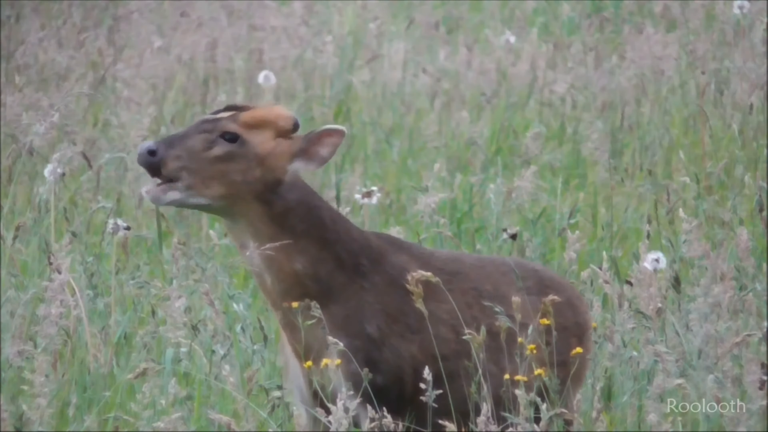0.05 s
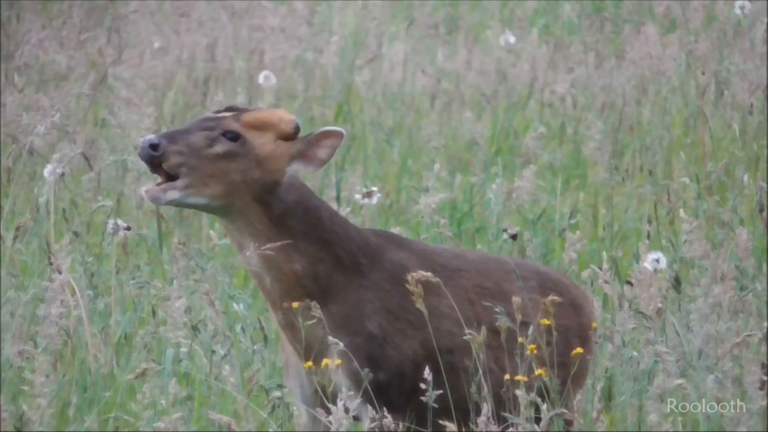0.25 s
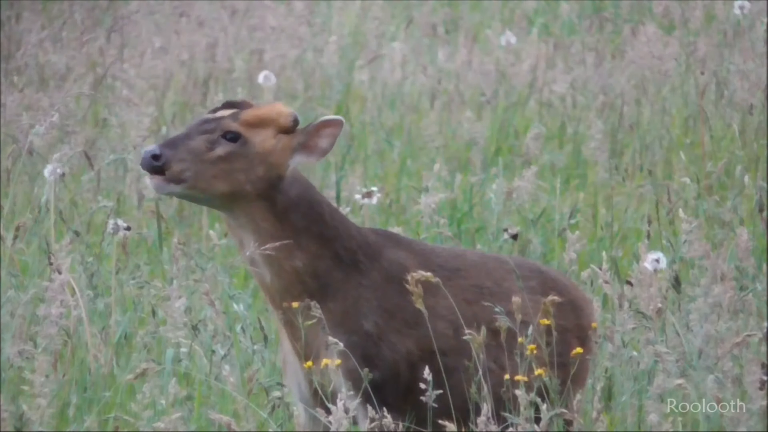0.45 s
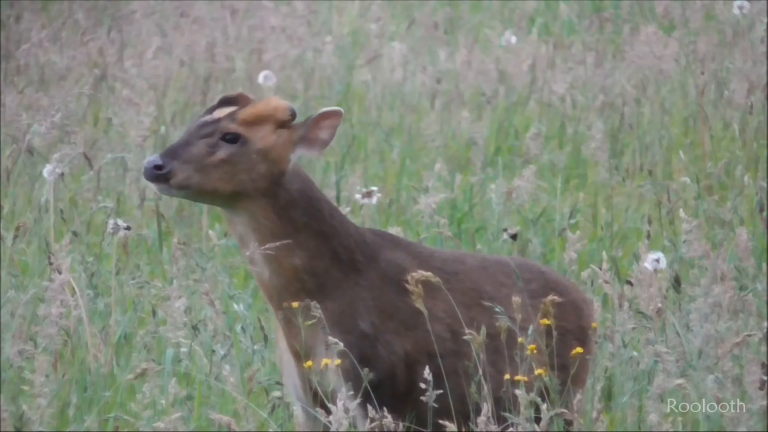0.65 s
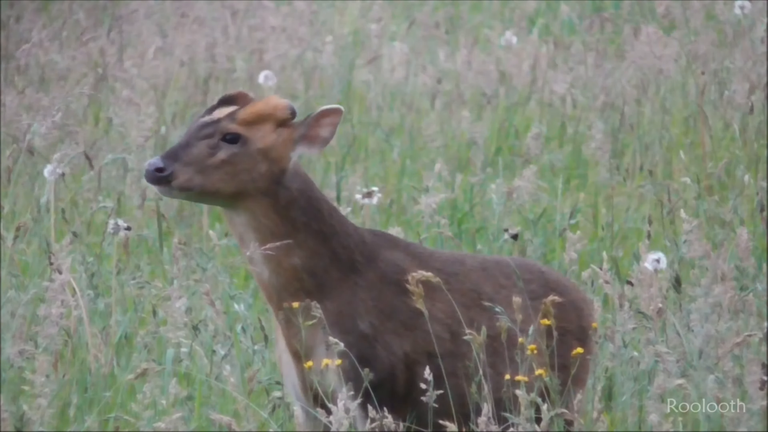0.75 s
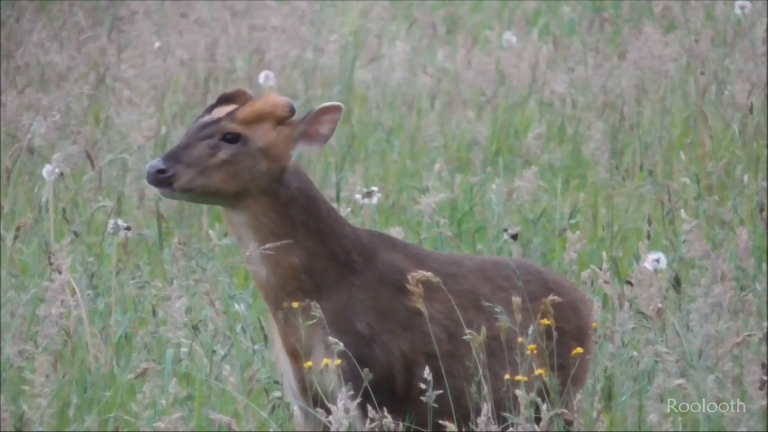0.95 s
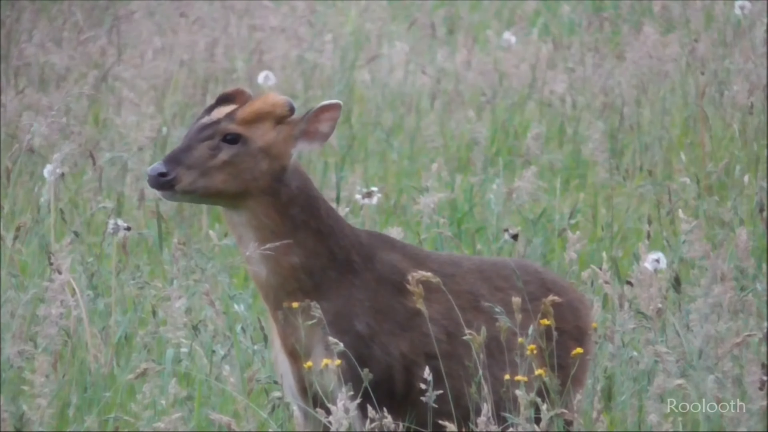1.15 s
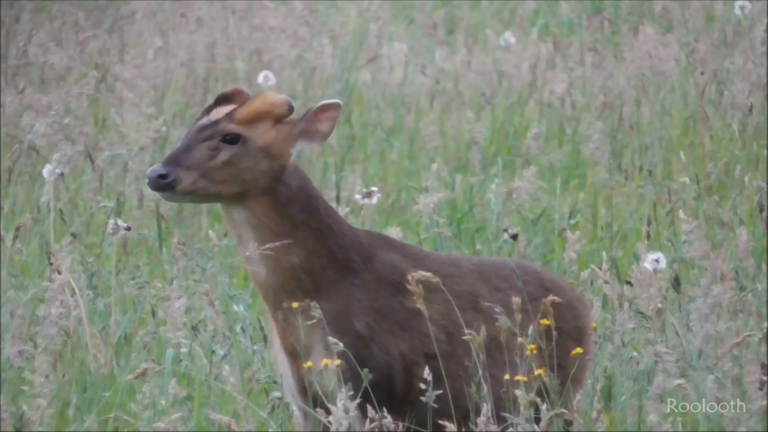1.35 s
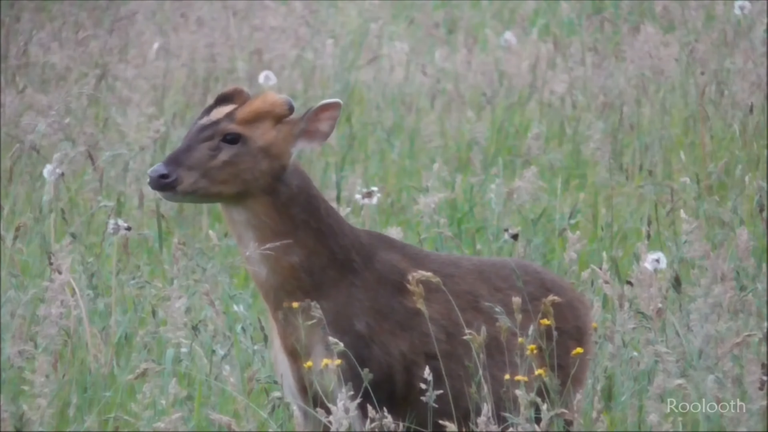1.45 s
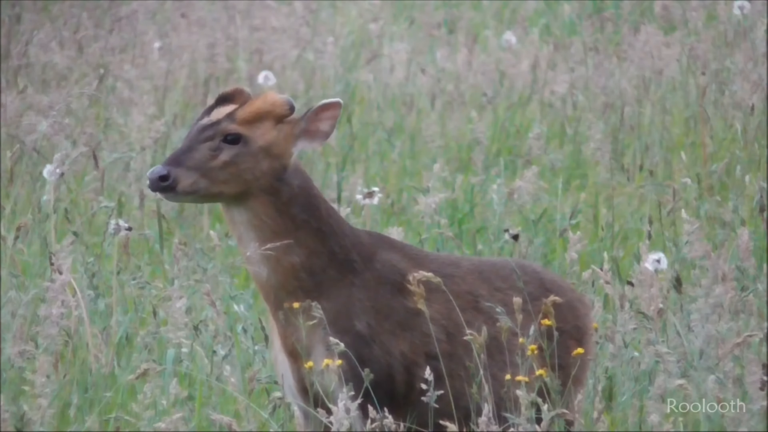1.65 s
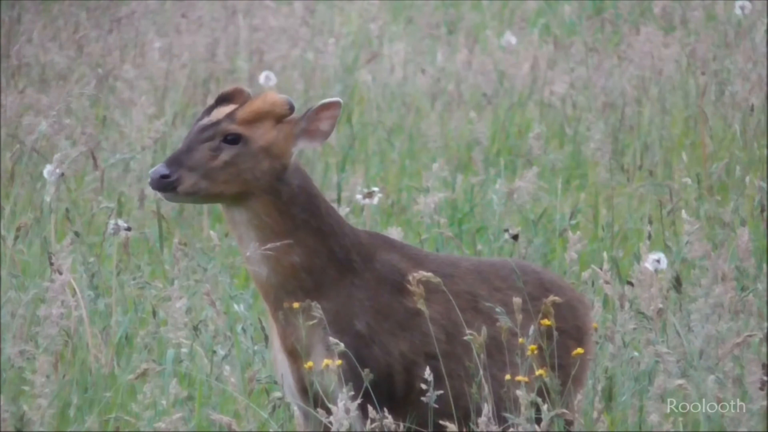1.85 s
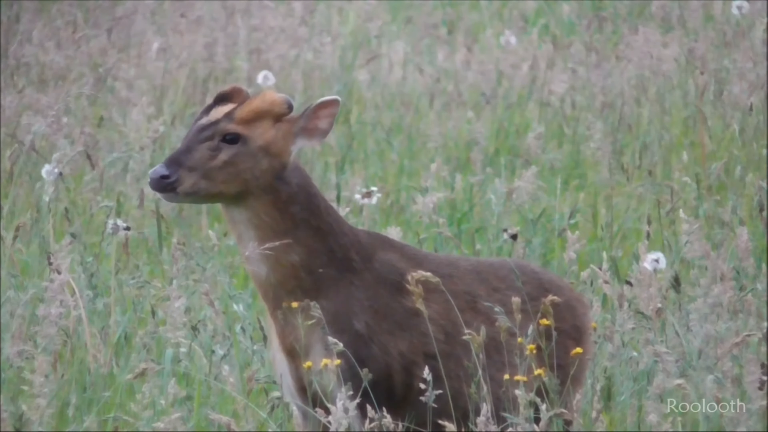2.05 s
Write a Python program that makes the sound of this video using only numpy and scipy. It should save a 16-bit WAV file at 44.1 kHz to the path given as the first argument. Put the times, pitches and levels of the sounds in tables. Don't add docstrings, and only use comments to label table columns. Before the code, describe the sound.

One abrupt, hoarse bark from a small deer, close and nearly centred, with a short echo from trees; a faint two-note bird whistle comes just before and twice after, over low outdoor rumble and hiss.

```python
import sys
import numpy as np
from scipy import signal
from scipy.fft import rfft, irfft, next_fast_len
from scipy.io import wavfile
from scipy.ndimage import uniform_filter1d, map_coordinates

SR = 44100
rng = np.random.default_rng(int(sys.argv[2]) if len(sys.argv) > 2 else 0)


def volts_from_decibels(level):
    exponent = np.asarray(level, float) / 20
    return 10 ** exponent


def int16_out(signal):
    q = np.round(np.clip(np.atleast_2d(signal).T, -1, 1) * 32767)
    wavfile.write(sys.argv[1], SR, q.astype(np.int16))


N = 92610

# frequency_hz, density_db [dB per Hz]
RUMBLE_SPECTRUM = [(25, -31), (60, -15.5), (100, -2), (125, -7), (200, -4), (600, -6.5), (1200, -16.5),
                   (2200, -37.5)]
# frequency_hz, density_db [dB per Hz]
HISS_SPECTRUM = [(1000, -39), (1700, -15), (2290, -7), (2930, -11.5), (4450, -13.5), (6150, -18.5),
                 (7200, -14), (10500, -11.5), (15500, -14)]
# frequency_hz, likeness [0-1]
COHERENCE = [(30, 0.93), (100, 0.92), (350, 0.73), (1000, 0.23), (3000, 0.088), (9000, 0.053)]
# frequency_hz, left_over_right_db
BALANCE = [(30, -1), (180, -3), (350, 1.4), (10000, -0.3)]
# start_s, length_s, centre_hz,
# width_hz, level_db
CHATTER_BANDS = [
    (0, .13, 2750, 120, -77),
    (0, .22, 6800, 600, -79),
    (1.79, .08, 3100, 800, -75),
    (1.87, .09, 4400, 900, -79),
    (2.01, .09, 4000, 900, -79),
    (1.03, .13, 3150, 450, -75),
    (.8, 1.3, 560, 12, -67),
]
# start_s, length_s, start_hz,
# end_hz, level_db
TWITTER_NOTES = [(.088, .016, 4650, 5100, -70), (.099, .015, 5050, 4400, -68),
                 (.125, .015, 6000, 6800, -78), (1.4, .025, 3620, 3620, -78), (.178, .014, 2400, 2430, -66),
                 (1.49, .03, 2200, 1800, -75), (1.683, .03, 2250, 1800, -73),
                 (1.695, .012, 2900, 2850, -73), (1.806, .014, 3500, 2800, -70),
                 (1.822, .012, 2950, 2850, -71), (1.805, .05, 3500, 3700, -80),
                 (1.802, .03, 4300, 4250, -78), (1.825, .05, 1780, 2050, -68),
                 (1.868, .04, 2050, 2500, -73), (1.896, .017, 4650, 4200, -63),
                 (1.924, .011, 4200, 6200, -69), (1.925, .014, 6500, 6400, -71),
                 (1.992, .018, 5150, 4400, -59), (2.02, .013, 4800, 6250, -69),
                 (2.024, .014, 6900, 7500, -72), (2.022, .04, 4200, 4650, -69),
                 (2.055, .04, 4650, 4750, -70), (2.008, .055, 3200, 3650, -75),
                 (2.05, .05, 3600, 3950, -77), (2.088, .018, 4800, 5500, -62),
                 (1.775, .03, 2900, 3300, -79)]
# time_s [after start], pitch_hz, level_db
WHISTLE_SHAPE = [(0, 2450, -27), (.018, 2650, -25), (.03, 3450, -11), (.041, 3610, -5), (.056, 3620, -14),
                 (.074, 3600, 1), (.083, 3590, -5), (.088, 3100, -24), (.096, 2800, -9), (.108, 2710, -16),
                 (.118, 2710, -8), (.13, 2700, -30)]
# start_s, level_db, stretch [times], lower_note_db
WHISTLE_CALLS = [
    (0.176, -55, 1, -1),
    (0.579, -48, 1.14, -7),
    (1.003, -48.5, 1, -2),
]
# time_s, pitch_hz, level_db, roughness [0-1], mouth [scale of the resonances]
BARK_COURSE = [
    (.207, 561.4, -46, 0.06, 0.65),
    (.222, 793.7, -32.5, 0.2, 0.94),
    (0.247, 798.4, -29, 0.33, 1.005),
    (.285, 789.6, -26.5, 0.44, 1.001),
    (.33, 835.8, -26.5, 0.58, 1.03),
    (0.452, 837.7, -26.5, 0.64, 1.007),
    (.52, 807, -29, 0.79, 1),
    (0.566, 794.3, -34.5, 0.63, 0.982),
    (0.601, 730, -47, 0, 0.95),
]
# time_s, pitch_hz, level_db
SECOND_COURSE = [
    (0.227, 950, -36),
    (0.245, 954.2, -26),
    (0.315, 967.7, -23),
    (0.339, 886.9, -30),
    (0.365, 975.3, -23),
    (0.394, 992.7, -23),
    (0.421, 923.2, -25),
    (0.468, 960, -25.5),
    (0.583, 915, -43),
]
# centre_hz, width_hz, level_db
THROAT_RESONANCES = [(665, 160, -8.5), (816, 294, -12.5), (967, 147, -4.5), (1247, 250, -12.5),
                     (1614, 150, -8), (2480, 130, -8.5), (2820, 130, -17), (3800, 650, -21.5),
                     (4270, 430, -24), (5200, 630, -30.5), (7060, 390, -42.5), (8380, 440, -38),
                     (10300, 2100, -49.5), (11800, 910, -42)]
# frequency_hz, level_db
VOICE_COLOUR = [(480, -74), (600, -24), (2000, -17), (3300, -27.5), (4500, -50), (5000, -61), (12500, -71),
                (15500, -63)]
# frequency_hz, level_db
GRASS_SCATTER = [(500, -18), (2500, -14.5), (5000, -7), (9000, -1.5)]
# frequency_hz, t60_s
TREE_DECAY = [(500, 0.64), (750, 1.02), (1000, 0.94), (2500, 0.88), (4500, 0.39), (10000, 0.1)]
# frequency_hz, level_db
ECHO_TINT = [(600, 2), (750, 4), (970, -3), (1200, -7.5), (2500, -12), (6000, 11)]

RUMBLE_DB, HISS_DB = -51.5, -70
TWITTER_DB = 1
PITCH_DRIFT, SECOND_DRIFT = .016, .04
JITTER, SHIMMER_DB = 0.15, 3
FLUTTER_DB, FLUTTER_PER_S = .5, 70
GROWL_DB, GROWL_PER_S = 1.2, 300
SECOND_DB, SECOND_DEPTH = -2.5, 0.49
DULLING, DULL_TOP_HZ, WAVER_DB, WAVER_PER_S = 0.72, 6500, 1, 45.66
RASP_S, RASP_LONG_S, RASP_DB = 0.244, 0.032, 11.5
CLOSE_S, CLOSED_S, NASAL_DB, HISS_UP_DB = 0.541, 0.563, 7, 2.5
DEER_LEAN_DB, SCATTER_S = -0.34, .05
ECHO_DB, ECHO_S = -13.5, .02
WHISTLE_ECHO_DB, TWITTER_ECHO_DB, BIRD_STRETCH = -13, -12, 2.2
NEAR_ECHO_DB, NEAR_STRETCH = -11, .3
TOP_HZ = 15720


def unit(x):
    return x / np.sqrt(np.mean(x ** 2) + 1e-20)


def along(points, hz):
    f, v = np.transpose(points)
    return np.interp(np.log(hz + 1), np.log(f + 1), v)


def wobble(rate):
    knots = rng.standard_normal(int(N * 400 / SR) + 4)
    return map_coordinates(knots, [np.arange(N) * min(rate, 399) / SR])


def filtered(x, response):
    m = next_fast_len(N + SR // 2)
    return irfft(rfft(x, m) * response(np.fft.rfftfreq(m, 1 / SR)), m)[..., :N]


def rush(spectrum, patchy_db):
    z = signal.stft(rng.standard_normal((2, N)), nperseg=512)[2]
    field = uniform_filter1d(rng.standard_normal(z.shape[1:]), size=5, axis=0)
    field = uniform_filter1d(field, size=12, axis=1)
    pair = signal.istft(z * volts_from_decibels(patchy_db * unit(field)), nperseg=512)[1][:, :N]
    (low, low_db), (high, high_db) = spectrum[0], spectrum[-1]
    shut = [(low / 4, low_db - 60)] + list(spectrum) + [(high * 4, high_db - 60)]

    def mid_side(hz):
        turn = np.arccos(np.clip(along(COHERENCE, hz), -1, 1)) / 2
        return volts_from_decibels(along(shut, hz)) * [np.cos(turn), np.sin(turn)]

    mid, side = filtered(pair, mid_side)
    stereo = np.array([mid + side, mid - side])
    return unit(filtered(stereo, lambda hz: volts_from_decibels(np.outer([.5, -.5], along(BALANCE, hz)))))


def background():
    swell_db = .4 * wobble(1.3) + .3 * wobble(8)
    rumble = volts_from_decibels(RUMBLE_DB + swell_db) * rush(RUMBLE_SPECTRUM, patchy_db=-0.06)
    return rumble + volts_from_decibels(HISS_DB) * rush(HISS_SPECTRUM, patchy_db=.2)


def chatter():
    t, out = np.arange(N) / SR, np.zeros((2, N))
    for start, length, hz, width_hz, db in CHATTER_BANDS:
        progress = np.clip((t - start) / length, 0, 1)
        swell = np.sqrt(np.abs(np.sin(np.pi * progress)))
        band = filtered(rng.standard_normal((2, N)), lambda f: np.exp(-((f - hz) / width_hz) ** 2))
        out += volts_from_decibels(db + 2.3 * wobble(60.06)) * swell * unit(band + band[::-1] / 2)
    return out


def twitter():
    t, out = np.arange(N) / SR, np.zeros(N)
    rasp = 1 + .009 * wobble(300)
    for start, length, hz0, hz1, db in TWITTER_NOTES:
        u = np.clip((t - start) / length, 0, 1)
        glide = u * (2 - u) if hz1 > hz0 else u ** 2
        phase = 2 * np.pi * np.cumsum((hz0 + (hz1 - hz0) * glide) * rasp) / SR
        swell = np.sqrt(np.abs(np.sin(np.pi * u))) * (u < 1)
        out += volts_from_decibels(db + TWITTER_DB) * swell * np.sin(phase)
    return out * volts_from_decibels(3 * wobble(150))


def whistler():
    s, hz, db = np.transpose(WHISTLE_SHAPE)
    t, out = np.arange(N) / SR, np.zeros(N)
    for start, level_db, stretch, lower_db in WHISTLE_CALLS:
        u = (t - start) / stretch
        phase = 2 * np.pi * np.cumsum(np.interp(u, s, hz)) / SR
        shape_db = np.interp(u, s, db + lower_db * (s > .085), -200, -200)
        tone = np.sin(phase) + volts_from_decibels(-31) * np.sin(2 * phase)
        out += volts_from_decibels(level_db + shape_db + wobble(70.15)) * tone
    return out


def second_vibration(t):
    s, hz, _ = np.transpose(SECOND_COURSE)
    drifting_hz = np.interp(t, s, hz) * (1 + SECOND_DRIFT * wobble(109.56))
    return np.cos(2 * np.pi * np.cumsum(drifting_hz) / SR)


def fold_pulses(cycles, hz, rough):
    chance = rng.standard_normal((2000, 2))[:int(cycles[-1])]
    when = np.interp(np.arange(len(chance)) + .5, cycles, np.arange(N))
    index = when.astype(int)
    at = rough[index]
    when = np.clip(when + JITTER * at * chance[:, 0] * SR / hz[index], 8, N - 9)
    taps = np.floor(when)[:, None] + np.arange(-7, 9)
    offset = taps - when[:, None]
    shape = np.sinc(offset) * np.cos(np.pi * offset / 16) ** 2
    sized = shape * volts_from_decibels(SHIMMER_DB * at * chance[:, 1])[:, None]
    return np.bincount(taps.astype(int).ravel(), sized.ravel(), N)


def resonance(x, hz, width_hz):
    turn = np.exp(2j * np.pi * np.cumsum(hz) / SR)
    pole = np.exp(-np.pi * 1.5 * width_hz / SR)
    return 2 * np.real(turn * signal.lfilter([(1 - pole) ** 2], [1, -2 * pole, pole ** 2], x / turn))


def throat(source, t, level_db, mouth):
    closing = np.clip((t - CLOSE_S) / (CLOSED_S - CLOSE_S), 0, 1)
    weak_db = level_db - level_db.max()
    rasp_db = RASP_DB * np.exp(-((t - RASP_S) / RASP_LONG_S) ** 2)
    voice = np.zeros(N)
    for k, (centre, width, db) in enumerate(THROAT_RESONANCES):
        dull_db = DULLING * weak_db * max(np.log2(centre / 1000), 0) + rasp_db * (centre > 5000)
        lift_db = closing * (NASAL_DB * (centre < 760) + HISS_UP_DB * (centre > DULL_TOP_HZ))
        lift_db = lift_db + (centre < DULL_TOP_HZ) * dull_db + WAVER_DB * wobble(WAVER_PER_S)
        voice += (-1) ** k * volts_from_decibels(db + lift_db) * resonance(source, centre * mouth, width)
    broad = filtered(source, lambda f: volts_from_decibels(along(VOICE_COLOUR, f)))
    return volts_from_decibels(20) * (voice + volts_from_decibels(DULLING * weak_db) * broad)


def deer():
    s, *cols = np.transpose(BARK_COURSE)
    t = np.arange(N) / SR
    hz, level_db, rough, mouth = [np.interp(t, s, c) for c in cols]
    rough = np.clip(rough, 0, 1)
    second = second_vibration(t)
    hz = hz * (1 + PITCH_DRIFT * wobble(60))
    cycles = np.cumsum(hz) / SR
    pulses = unit(fold_pulses(cycles, hz, rough)) * (1 + SECOND_DEPTH * second)
    air = unit(rng.standard_normal(N) * (1.08 + np.cos(2 * np.pi * cycles)))
    source = np.sqrt(1 - rough) * pulses + np.sqrt(rough) * air
    effort_db = level_db + FLUTTER_DB * wobble(FLUTTER_PER_S) + GROWL_DB * wobble(GROWL_PER_S)
    source = source * volts_from_decibels(effort_db) * (t > s[0]) * (t < s[-1])
    voice = throat(source, t, level_db, mouth)
    s2, _, db2 = np.transpose(SECOND_COURSE)
    fade = np.clip(np.minimum(t - s2[0], s2[-1] - t) / 0.0057, 0, 1)
    voice = voice + fade * volts_from_decibels(SECOND_DB + 3 + np.interp(t, s2, db2) + 1.6 * wobble(80.1)) * second

    def radiation(f):
        low_cut = 1 / np.sqrt(1 + (560 / (f + 1)) ** 14)
        return low_cut * (0.39 + 0.58 / (1 + (f / 4550) ** 24))

    return filtered(voice, radiation)


def scattered(x):
    t = np.arange(SR // 10) / SR
    smear = rng.standard_normal(len(t)) * volts_from_decibels(-60 * t / SCATTER_S)
    side = signal.fftconvolve(x, smear / np.linalg.norm(smear))[:N]
    side = filtered(side, lambda f: volts_from_decibels(along(GRASS_SCATTER, f)))
    return np.array([x + side, x - side])


def trees(x, stretch, delay_s):
    hz, t, z = signal.stft(rng.standard_normal((2, SR)), SR, nperseg=256)
    decay_db = -60 * t / (stretch * along(TREE_DECAY, hz))[:, None]
    tail = signal.istft(z * volts_from_decibels(decay_db), SR, nperseg=256)[1]
    tail = (tail + 0.26 * tail[::-1]) * volts_from_decibels(2 * wobble(33)[:tail.shape[1]])
    delayed = np.pad(x, (int(delay_s * SR), 0))[None]
    return signal.fftconvolve(delayed, tail / np.linalg.norm(tail[0]), axes=1)[:, :N]


def scene():
    far, near, bark = twitter(), whistler(), deer()
    tinted = filtered(bark, lambda f: volts_from_decibels(along(ECHO_TINT, f)))
    far_echo = volts_from_decibels(TWITTER_ECHO_DB) * far
    wet = trees(volts_from_decibels(ECHO_DB) * tinted, 0.98, ECHO_S)
    wet = wet + trees(volts_from_decibels(WHISTLE_ECHO_DB) * near + far_echo, BIRD_STRETCH, .03)
    wet = wet + trees(volts_from_decibels(NEAR_ECHO_DB) * near + far_echo, NEAR_STRETCH, .004)
    front = scattered(bark) * volts_from_decibels([[DEER_LEAN_DB / 2], [-DEER_LEAN_DB / 2]])
    birds = near * volts_from_decibels([[.3], [-.3]]) + far * volts_from_decibels([[.4], [-.4]])
    return background() + chatter() + birds + front + wet


def band_limit(x):
    return signal.sosfilt(signal.butter(12, 15650, fs=SR, output="sos"), x)


def record(dry):
    mix = filtered(dry, lambda hz: hz < TOP_HZ)
    return band_limit(mix)


dry = scene()
out = record(dry)
int16_out(out)
```